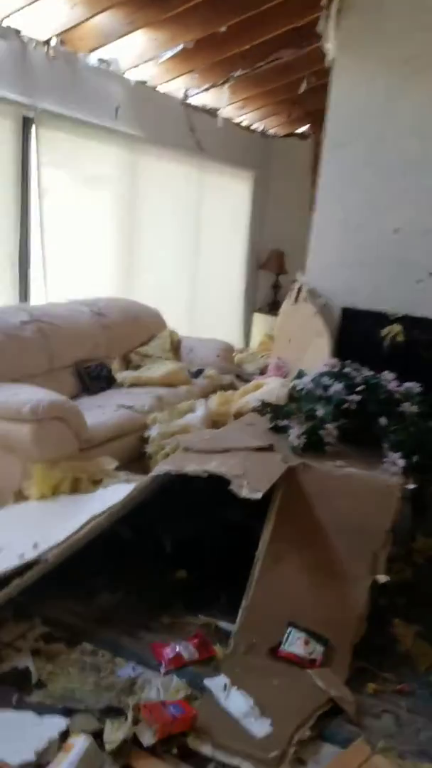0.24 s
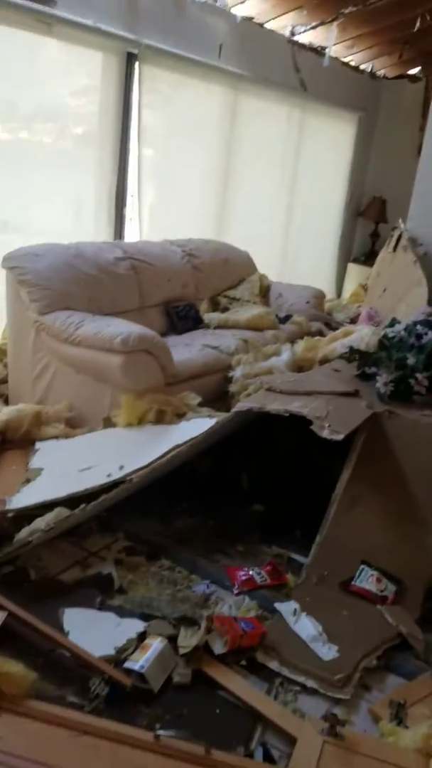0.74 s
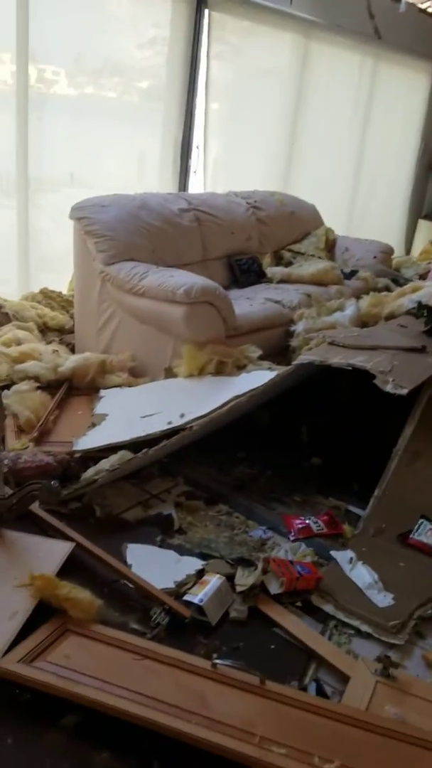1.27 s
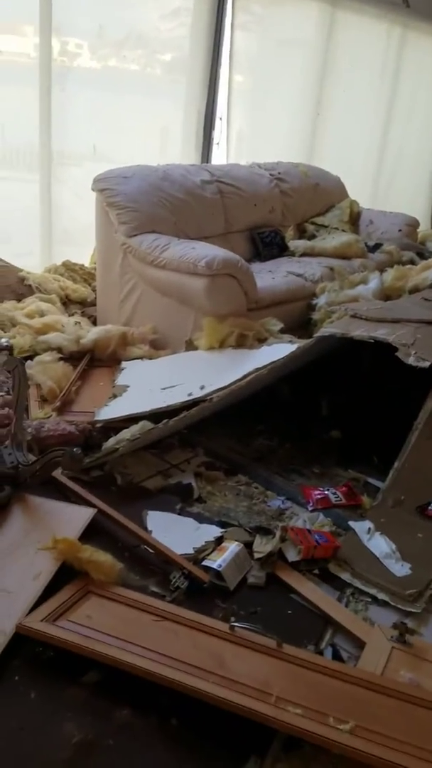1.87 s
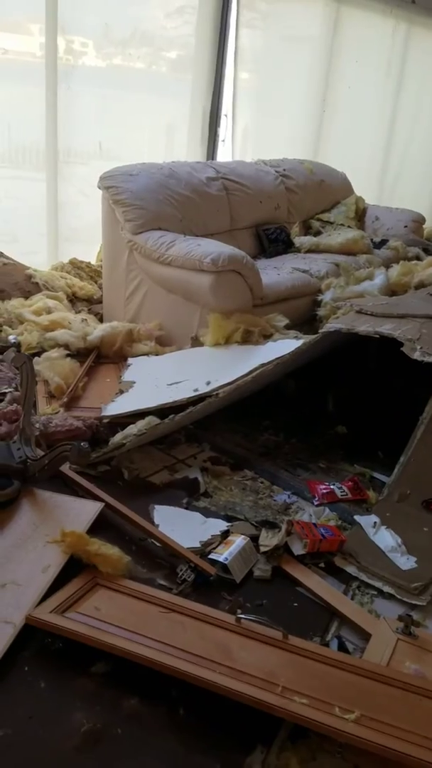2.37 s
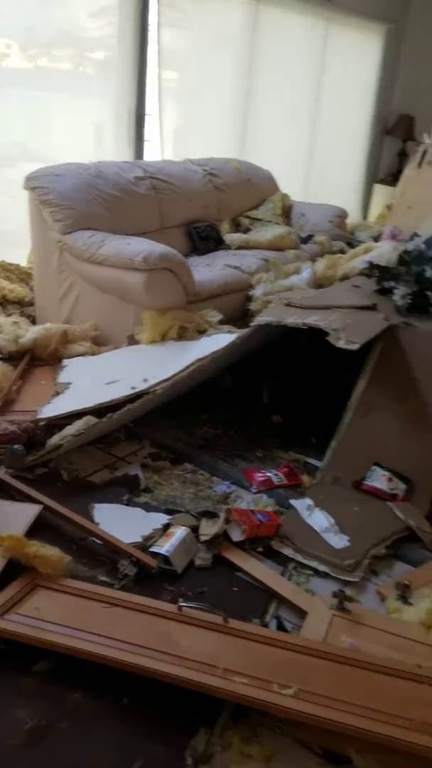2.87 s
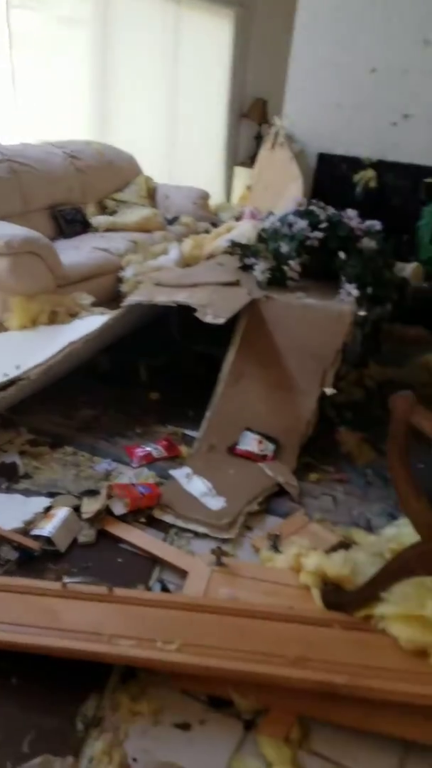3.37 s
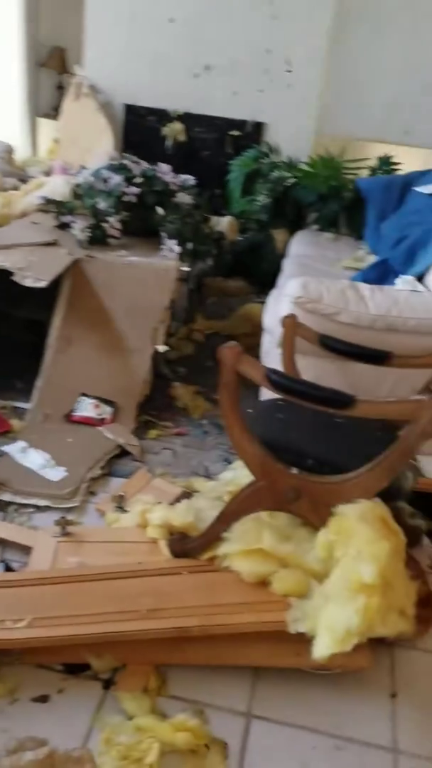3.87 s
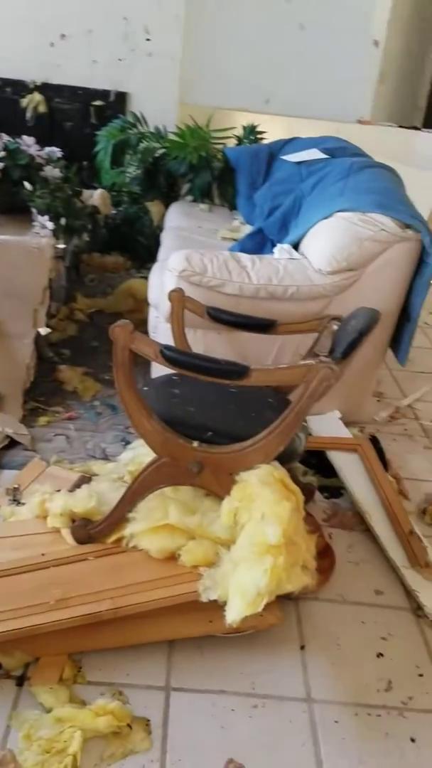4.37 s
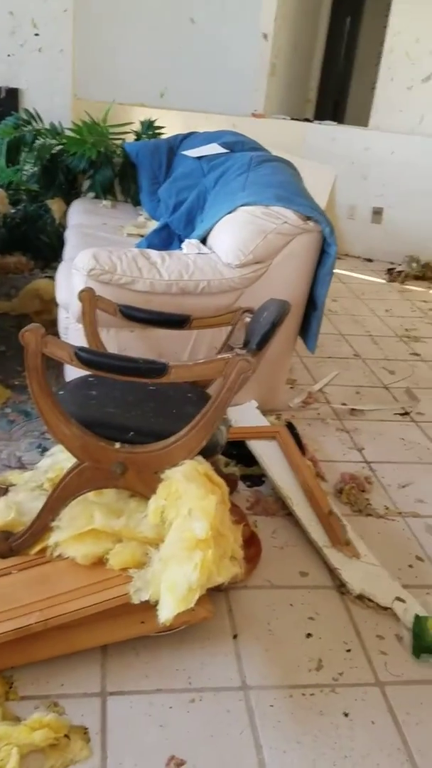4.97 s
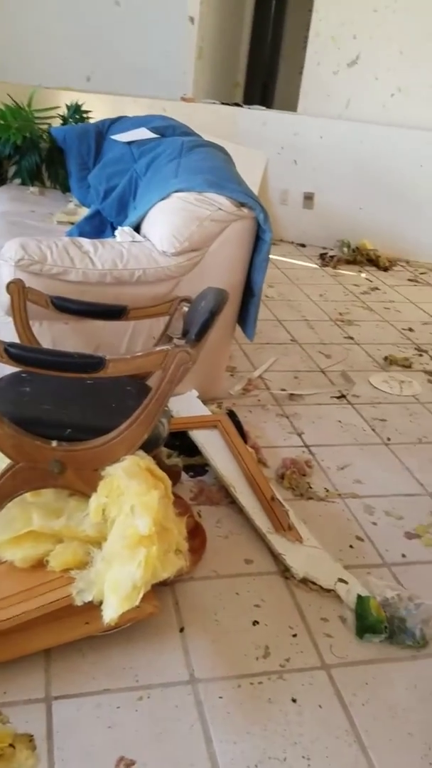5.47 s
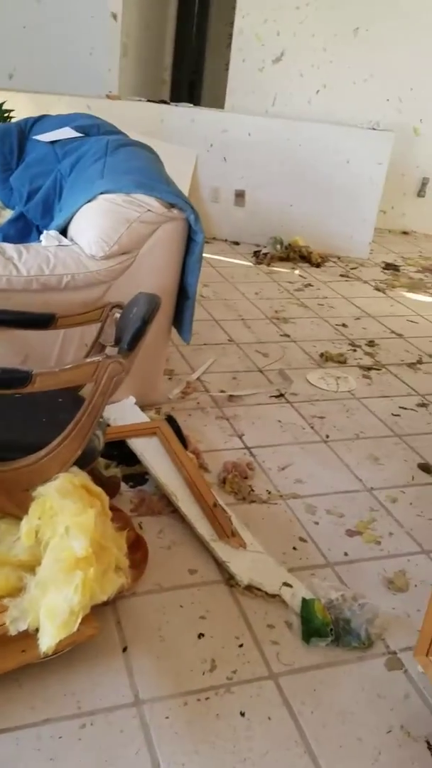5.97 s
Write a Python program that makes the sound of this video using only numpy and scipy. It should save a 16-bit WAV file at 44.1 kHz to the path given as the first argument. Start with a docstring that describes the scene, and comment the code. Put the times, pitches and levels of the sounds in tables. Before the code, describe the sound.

Careful footsteps cross rubble in a bare, tiled room. A brittle shard clinks and rattles early, then plaster crunches, splinters snap, chips squeak and loose boards knock dully, busiest from one to two and a half seconds. The steps thin out to a near pause, then soft gritty scuffs on tile. Short bright echoes follow; stereo microphones are carried by the walker, over faint outdoor air, weak hum and hiss.

```python
"""Footsteps over storm debris

Someone picks a way over debris on the tile floor of a bare, echoing room, carrying two microphones.
Plaster crunches, splinters snap and chips squeak: random fractures drive filters and resonators.
Loose boards knock and a shard clinks as sums of damped modes; soft steps scuff as filtered grit.
Decaying noise gives the echoes; faint outdoor air, a far generator's hum and hiss lie beneath."""
import sys
import numpy as np
from scipy import signal
from scipy.fft import rfft, irfft, next_fast_len
from scipy.io import wavfile

SR = 44100
rng = np.random.default_rng(int(sys.argv[2]) if len(sys.argv) > 2 else 0)


def master_out(mix):
    """Clip the mix to full scale and print it as 16-bit PCM to the path in sys.argv[1]."""
    frames = np.transpose(np.atleast_2d(mix))
    ceiling = np.clip(frames, -1, 1)
    pcm = np.round(ceiling * 32767).astype(np.int16)
    wavfile.write(sys.argv[1], SR, pcm)


N = 274811
MIC_LAG_S = 0.00051  # travel time between the microphones


def amp(db):
    """Level law: decibels to amplitude gain."""
    return 10 ** (np.asarray(db) / 20)


def read(points, hz):
    """Logarithmic frequency scale: interpolates a table of (frequency [Hz], value)."""
    f, value = np.transpose(points)
    return np.interp(np.log(hz + 1), np.log(f + 1), value)


def sized(x, db):
    """Energy equivalence: gives a short sound the energy of 1/20 s at this rms level."""
    energy = np.sum(x ** 2) + 1e-20
    return amp(db) * x * np.sqrt(SR / 20 / energy)


def add(mix, s, sound):
    """Superposition: mixes a sound in at time s."""
    part = mix[max(round(s * SR), 0):][:len(sound)]
    part += sound[:len(part)]


def colour(x, points, tilt_db=0, size=1024):
    """Minimum-phase filtering: this spectrum, tilted above 500 Hz by some dB per octave."""
    hz = abs(np.fft.fftfreq(size, 1 / SR))
    octaves = np.log2(np.maximum(hz, 500) / 500)
    log_gain = np.log(amp(read(points, hz) + tilt_db * octaves))
    # the Hilbert transform of the log gain supplies the phase
    response = np.exp(np.conj(signal.hilbert(log_gain)))
    return signal.fftconvolve(x, np.fft.ifft(response).real)


def ring(x, hz, t60):
    """Damped resonance: one mode, driven by x, decays by 60 dB in t60 seconds."""
    radius = amp(-60 / (max(t60, 1e-3) * SR))
    angle = 2 * np.pi * hz / SR
    poles = [1, -2 * radius * np.cos(angle), radius * radius]
    return signal.lfilter([1, 0, -1], poles, np.pad(x, (0, SR // 10)))


def grains(rise, fade, per_s, spread_db, clump_db=0):
    """Random impulse excitation: uneven tiny fractures, clumped, as pressure builds and lets go."""
    rise, fade = max(rise, 1e-4), max(fade, 1e-4)
    t = np.arange(SR // 2) / SR
    pressure = np.minimum(t / rise, 1) * np.exp(-np.maximum(t - rise, 0) / fade)
    knots = np.linspace(0, t[-1], num=80)
    clumps = amp(clump_db * np.interp(t, knots, rng.uniform(-1.55, 1, len(knots))))
    chance, size, sign = rng.random((len(t), 3)).T
    happens = chance < per_s / SR
    sizes = amp(-spread_db * np.log(np.maximum(size, .05)))
    return pressure * clumps * happens * sizes * np.sign(sign - .5)


def diffuse(pair):
    """Diffuse-field coherence: the microphones agree in the bass and differ in the treble."""
    size = next_fast_len(pair.shape[1])
    a, b = rfft(pair, size)
    same = np.sinc(2 * np.fft.rfftfreq(size, 1 / SR) * MIC_LAG_S) * .86
    right = same * a + np.sqrt(1 - same ** 2) * b
    return irfft(np.array([a, right]), size)[:, :pair.shape[1]]


# spectrum of the outdoor air: (frequency [Hz], relative level [dB])
AIR = [(15, -33), (25, -5), (64, -16.5), (144, -14), (184, -12.5), (316, -12), (394, -8.5), (435, -11),
       (530, -11.5), (805, -12.5), (911, -8.5), (1080, -14), (2160, -17), (2970, -22.5), (9000, -36),
       (11700, -74), (19800, -120)]
# spectrum of the microphones' self-noise: (frequency [Hz], relative level [dB])
HISS = [(100, -37), (6000, -3.5), (9500, -3), (11500, 0), (13000, 3), (16000, 3.5)]
# a distant generator's partials: (mean frequency [Hz], level [dB rms])
HUM = [(59.2, -92.5), (177.6, -76)]
AIR_DB, HISS_DB = -65.5, -71.5  # rms levels


def background():
    """Stationary noise and frequency modulation: air and wavering hum by the open roof, over hiss."""
    air = diffuse(np.array([colour(rng.standard_normal(N), AIR, size=8192)[:N] for side in range(2)]))
    hiss = np.array([colour(rng.standard_normal(N), HISS)[:N] for side in range(2)])
    t = np.arange(N) / SR
    knots = np.linspace(0, t[-1], num=40)
    wander = np.interp(t, knots, rng.standard_normal(len(knots)))
    warped_t = np.cumsum(1 + 0.0096 * wander) / SR
    hum = sum(amp(db) * np.sqrt(2) * np.sin(2 * np.pi * hz * warped_t) for hz, db in HUM)
    return amp(AIR_DB) * air / air.std() + amp(HISS_DB) * hiss / hiss.std() + hum


# reverberation of the room: (frequency [Hz], 60 dB decay time [s])
ROOM = [(100, 0.64), (400, 0.6), (1300, 0.71), (2500, 0.62), (5000, 0.52), (9000, 0.47), (15000, 0.34)]


def echoes():
    """Exponential reverberant decay: dense echoes from tile and bare walls; the high treble dies first."""
    hz, t, z = signal.stft(diffuse(rng.standard_normal((2, SR))), SR, nperseg=256)
    early = 1 + 1.16 * np.exp(-t / 0.017)  # near floor and furniture answer first
    decay = amp(-60 * t / read(ROOM, hz)[:, None])
    tail = signal.istft(z * early * decay, SR, nperseg=256)[1]
    tail *= np.clip((np.arange(tail.shape[1]) / SR - .001) / .002, 0, 1)  # silent for the first 1 ms
    return tail / np.linalg.norm(tail[0])


def room(x, count=5):
    """Convolution reverberation: random echo patterns, crossfaded in turn, keep it smooth and even."""
    place = np.arange(N) / SR / .03  # one pattern gives way to the next every 0.03 s
    out = np.zeros((2, N))
    for k in range(count):
        away = abs((place - k + count / 2) % count - count / 2)
        share = np.cos(np.pi / 2 * np.minimum(away, 1))
        out += signal.fftconvolve((x * share)[None], echoes(), axes=1)[:, :N]
    return out


def direct(x, lag_s):
    """Difference in arrival time: the straight path reaches the right microphone lag_s after the left."""
    return np.array([x, np.roll(x, round(lag_s * SR))])


# spectrum of grit rubbed on tile: (frequency [Hz], relative level [dB])
TILE = [(100, -21), (400, -3), (750, -5.5), (1200, 1.5), (2300, 0.5), (3100, -2), (4200, -1.5), (5400, -1),
        (6800, -9.5), (8500, -3), (10500, -12), (14000, -5)]


def rub(rise, fade, top_hz, db):
    """Friction noise: fine grit between sole and tile hisses, weakening above top_hz."""
    grit = colour(grains(rise, fade, per_s=9000, spread_db=2.0, clump_db=-3.5), TILE)
    return sized(colour(grit, [(top_hz, 0), (2 * top_hz, -11), (6 * top_hz, -15)]), db)


# a sole slides over bare tile, then bites on grit as it takes weight; levels before the path gains:
# (time [s], slide [s], slide level [dB], bite level [dB])
SCUFFS = [(0, 0.022, -62, -77), (.06, 0.11, -63, -82), (4.26, .11, -62, -75), (4.37, .02, -60.5, -64.5),
          (4.42, .04, -61.5, -64), (4.96, 0.14, -57.5, -72), (5.07, 0.083, -55, -57.5),
          (5.42, 0.16, -64.5, -87), (5.68, 0.13, -56.5, -61)]
SLIDE_TOP_HZ, SLIDE_FADE = 2520, 0.36  # the fade is a share of the slide
BITE_TOP_HZ, BITE_RISE_S = 11500, 0.019
BITE_AT, BITE_FADE = .85, 0.4  # start and fade as shares of the slide


def scuffs():
    """Sliding friction: each light step swells as a dull slide and ends in a short, bright bite."""
    out = np.zeros(N)
    for s, slide, slide_db, bite_db in SCUFFS:
        add(out, s, rub(slide, SLIDE_FADE * slide, SLIDE_TOP_HZ, slide_db))
        add(out, s + BITE_AT * slide, rub(BITE_RISE_S, BITE_FADE * slide, BITE_TOP_HZ, bite_db))
    return out


# a chip is dragged over the glaze: (time [s], level before the path gains [dB], pitch [Hz])
SQUEAKS = [(.17, -69, 2800), (.175, -75, 5900), (1.299, -51, 11970), (1.64, -47, 5550), (2.286, -50, 6000),
           (3.07, -56, 3000), (3.069, -65, 13700), (4.386, -55, 2340)]
SQUEAK_RISE_S, SQUEAK_FADE_S, SQUEAK_T60_S = 0.0022, 0.017, 0.023


def squeaks():
    """Stick-slip excitation: a quick run of slips keeps a chip ringing at one pitch."""
    out = np.zeros(N)
    for s, db, hz in SQUEAKS:
        slips = grains(SQUEAK_RISE_S, SQUEAK_FADE_S, per_s=3000, spread_db=3)
        add(out, s, sized(ring(slips, hz, SQUEAK_T60_S), db))
    return out


# a shard tips against the tile and rattles: (time [s], level before the path gains [dB])
CLINKS = [(0.51, -48), (0.524, -53.5), (.553, -37), (.561, -48), (.566, -42.5), (.597, -51), (.629, -53),
          (.641, -46.5)]
# the shard's modes: (nominal frequency [Hz], relative level [dB], 60 dB decay time [s])
SHARD = [(1970, -11, 0.0035), (2240, 1.5, 0.0079), (2640, 0, 0.014), (2940, -1.5, 0.0064),
         (4480, 2, 0.0039), (5140, 0, 0.0084), (5407, -3.5, 0.022), (6220, -3.5, 0.018),
         (9560, -15.5, 0.022), (12630, -10, 0.0093), (14340, -17, .025)]


def clinks():
    """Modal superposition: each touch rings all the shard's modes for a moment."""
    out, t = np.zeros(N), np.arange(SR // 8) / SR
    onset = (1 - np.exp(-t / .0006)) ** 2
    for s, db in CLINKS:
        # pinned on edge at first, the shard rings a little higher
        pitch = (1.04 if s < .54 else 1) * rng.normal(1, .002)
        modes = np.zeros(len(t))
        for hz, mode_db, t60 in SHARD:
            wave = np.sin(2 * np.pi * (hz * pitch * t + rng.random()))
            modes += amp(mode_db - 60 * t / t60) * wave
        add(out, s, sized(modes * onset, db))
    return out


# weight lands on loose boards:
# (time [s], fade [s], level before the path gains [dB], centre of the blow [Hz])
KNOCKS = [(.308, 0.014, -55, 523), (.99, 0.056, -48, 455), (1.27, .014, -63, 544), (1.485, 0.032, -62, 155),
          (1.539, 0.0075, -46.5, 380), (1.666, 0.008, -41, 570), (2.105, 0.039, -54, 400),
          (2.168, 0.017, -53, 434), (2.412, 0.034, -38, 336), (2.53, 0.029, -56, 320),
          (2.77, 0.029, -50, 444), (2.902, 0.012, -47.5, 424), (3.444, 0.048, -45.5, 340),
          (4.52, .03, -65, 352), (4.688, 0.0088, -72.5, 700), (5.975, 0.0066, -67.5, 640)]
# a loose board's modes: (frequency [Hz], relative level [dB], 60 dB decay time [s])
BOARD = [(224, -1.5, 0.024), (348, -2, 0.03), (417, 1.5, 0.018), (563, 0.5, 0.013), (664, 2, 0.021),
         (784, 1, 0.019)]
# spectrum of the floor's thump: (frequency [Hz], relative level [dB])
FLOOR = [(20, -22), (45, -10), (85, -3), (130, -2), (200, -5.5), (400, -19), (2000, -68)]
KNOCK_RISE = 0.33  # as a share of the fade
# the thump against the board for a blow at THUMP_HZ; duller blows shake the floor more
THUMP_DB, THUMP_HZ, THUMP_DB_PER_OCTAVE = -20, 384, -12.5


def knocks():
    """Impact excitation of modes: a higher-centred blow favours a board's higher modes; the floor thumps."""
    out = np.zeros(N)
    for s, fade, db, hz in KNOCKS:
        chatter = grains(KNOCK_RISE * fade, fade, per_s=2000, spread_db=3.0)
        blow = ring(chatter, hz, 0.0061)
        board = sum(amp(mode_db) * ring(blow, mode_hz, t60) for mode_hz, mode_db, t60 in BOARD)
        thump_db = db + THUMP_DB + THUMP_DB_PER_OCTAVE * np.log2(hz / THUMP_HZ)
        add(out, s, sized(board, db))
        add(out, s, sized(colour(chatter, FLOOR, size=4096), thump_db))
    return out


# spectrum of breaking plaster, also used for the crunches: (frequency [Hz], relative level [dB])
PLASTER = [(100, -24), (300, -12), (650, -6), (1200, 0), (2300, 2), (3300, -6), (4800, -3.5), (6800, -11),
           (8200, -11), (10000, -17.5), (13000, -15), (16000, -19.5)]
# a splinter or chip snaps and rings: (time [s], ring level before the path gains [dB], ring [Hz])
SNAPS = [(1.001, -38, 2530), (1.016, -46.5, 2320), (1.36, -48, 1750), (1.381, -54.5, 1500),
         (1.54, -36, 2230), (1.542, -36.5, 5060), (1.665, -33, 1350), (1.669, -38.5, 4000),
         (1.695, -39, 1230), (1.901, -53.5, 4500), (2.001, -55.5, 2200), (2.039, -49.5, 2450),
         (2.108, -42.5, 2600), (2.172, -42.5, 4400), (2.3, -45.5, 1860), (2.417, -40.5, 1870),
         (2.512, -45.5, 940), (3.024, -52.5, 2070), (3.2, -59.5, 2280), (3.215, -61, 2600),
         (4.109, -74.5, 2220), (5.16, -62, 3900)]
SNAP_CYCLES = 16.5  # a ring falls by 60 dB in this many cycles
# the crack against the ring for a snap at HARD_SNAP_DB; softer snaps have relatively more crack
CRACK_DB, CRACK_DB_PER_DB, HARD_SNAP_DB = -5.5, -0.26, -36


def snaps(crack_tilt_db=-0.1):
    """Brittle fracture: a crack of a few milliseconds sets a piece ringing; higher rings die sooner."""
    out = np.zeros(N)
    for s, db, hz in SNAPS:
        fractures = grains(rise=0.0011, fade=0.0021, per_s=16000, spread_db=2.0)
        crack = colour(fractures, PLASTER, crack_tilt_db)
        crack_db = db + CRACK_DB + CRACK_DB_PER_DB * (db - HARD_SNAP_DB)
        add(out, s, sized(crack, crack_db))
        add(out, s, sized(ring(crack, hz, SNAP_CYCLES / hz), db))
    return out


# a sole crushes plaster crumbs:
# (time [s], fade [s], level before the path gains [dB], brightness [dB per octave])
CRUNCHES = [(.32, 0.035, -54, -2), (.44, 0.17, -51.5, -1), (.549, 0.01, -43, 0.5), (.947, 0.07, -40.5, 2.5),
            (1.02, 0.11, -41.5, 2), (1.218, 0.11, -42.5, 1.5), (1.268, 0.047, -45, 2.5),
            (1.449, .18, -48, 1.5), (1.537, 0.031, -35, 2.5), (1.64, 0.0066, -40, 0.5),
            (1.663, 0.053, -39.5, 3), (1.796, 0.027, -48.5, 3), (1.899, 0.0084, -48.5, 3),
            (2.0, .01, -53, 4), (2.037, 0.063, -45, 2), (2.103, 0.031, -38.5, 3), (2.165, 0.048, -34, 2),
            (2.265, 0.12, -47.5, 1.5), (2.386, 0.023, -36, 1), (2.412, 0.04, -34.5, 3),
            (2.495, 0.14, -42.5, -6), (2.785, 0.03, -50.5, -2.5), (2.811, 0.014, -49, 0),
            (2.895, 0.067, -45.5, -7.5), (3.023, 0.027, -59.5, 1.5), (3.449, 0.06, -49.5, -7.5),
            (3.476, 0.042, -48.5, -3), (3.575, 0.041, -58.5, 1), (3.66, 0.059, -58, 0)]
CRUNCH_RISE = 0.12  # a longer crunch builds more slowly: rise as a share of the fade


def crunches(chip_db=-9, chip_t60=0.0039):
    """Granular crushing: fine crumbs break while a few larger chips crackle at their own pitches."""
    out = np.zeros(N)
    for s, fade, db, tilt_db in CRUNCHES:
        rise = CRUNCH_RISE * fade
        crumbs = grains(rise, fade, per_s=4500, spread_db=4.0, clump_db=7.0)
        add(out, s, sized(colour(crumbs, PLASTER, tilt_db), db))
        for hz in (750, 1400, 2300):
            chip = grains(rise, fade, per_s=140, spread_db=2.5)
            chip_hz = hz * rng.uniform(0.81, 1.3)
            add(out, s, sized(ring(chip, chip_hz, chip_t60), db + chip_db))
    return out


# balance of the microphones for the feet: (frequency [Hz], left minus right [dB])
BALANCE = [(60, -3), (200, -1.5), (400, -4), (700, -2), (1300, -4.5), (2400, -5), (4400, -3.5), (8000, 0.5),
           (15000, 5)]
# path gains of each group of sources: (straight [dB], through the room [dB])
SOFT_PATHS_DB, SHARP_PATHS_DB = (-6, -1), (-4.5, -4)
SHARD_PATHS_DB, LIGHT_PATHS_DB = (-1, -0.5), (-3.5, -1.5)
DEBRIS_LEAD_S, TILE_LEAD_S = .00026, -.00015  # how much sooner the left microphone hears the feet


def scene():
    """Direct and reverberant fields: feet by both paths; the right side is duller but louder."""
    sources = [(crunches() + knocks(), SOFT_PATHS_DB, DEBRIS_LEAD_S),
               (snaps() + squeaks(), SHARP_PATHS_DB, DEBRIS_LEAD_S),
               (clinks(), SHARD_PATHS_DB, DEBRIS_LEAD_S),
               (scuffs(), LIGHT_PATHS_DB, TILE_LEAD_S)]
    straight = sum(direct(amp(paths_db[0]) * x, lead) for x, paths_db, lead in sources)
    reverberant = room(sum(amp(paths_db[1]) * x for x, paths_db, lead in sources))
    size = next_fast_len(N)
    lean_db = read(BALANCE, np.fft.rfftfreq(size, 1 / SR)) / 2  # half to each side
    spectra = rfft(straight + reverberant, size) * amp([lean_db, -lean_db])
    return irfft(spectra, size)[:, :N] + background()


def record(dry):
    """Band limitation: the recorder passes sound up to about 15.9 kHz."""
    low_pass = signal.firwin(511, 15900, window=("kaiser", 9), fs=SR)
    return signal.oaconvolve(dry, low_pass[None], "same")


dry = scene()
out = record(dry)
master_out(out)
```